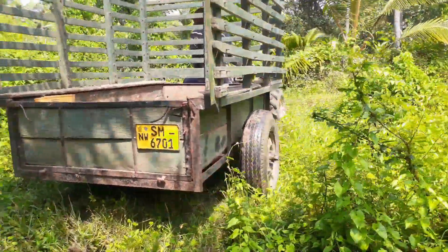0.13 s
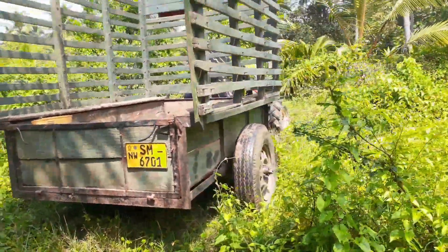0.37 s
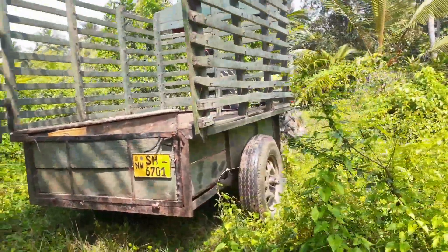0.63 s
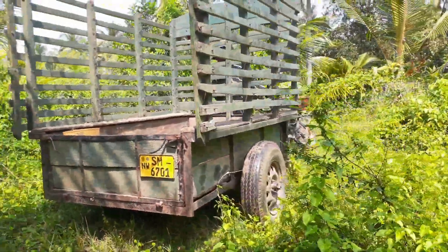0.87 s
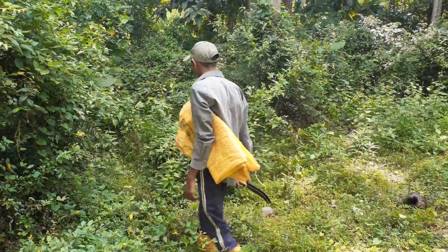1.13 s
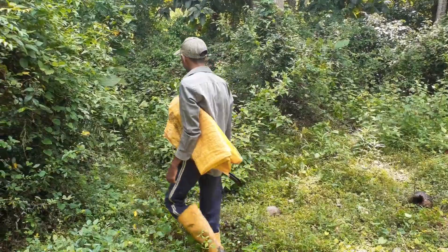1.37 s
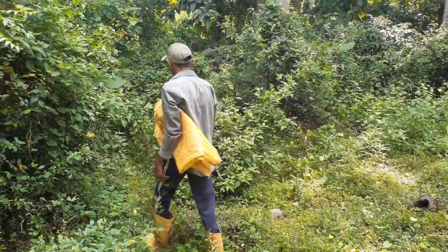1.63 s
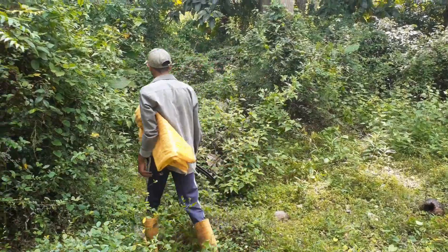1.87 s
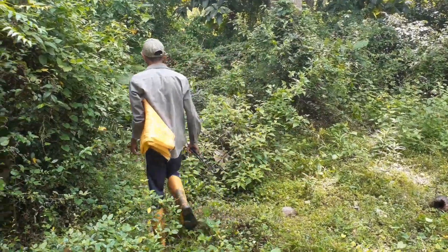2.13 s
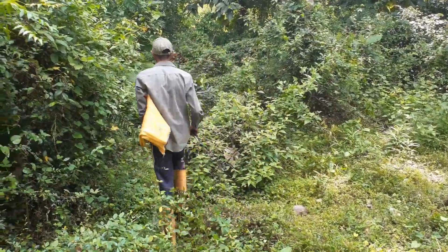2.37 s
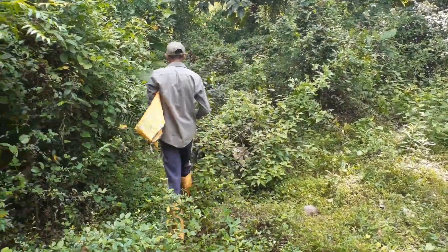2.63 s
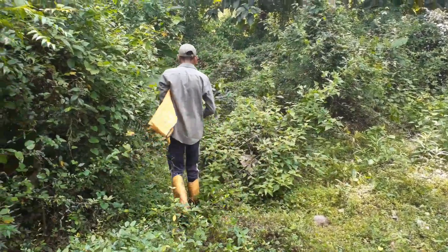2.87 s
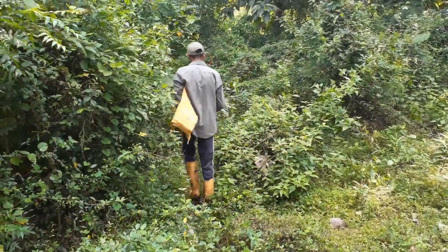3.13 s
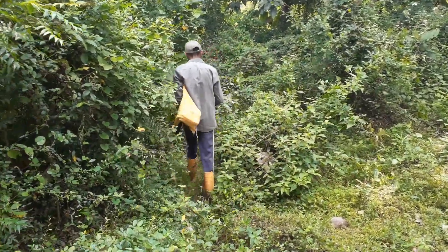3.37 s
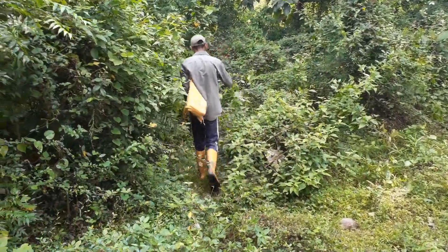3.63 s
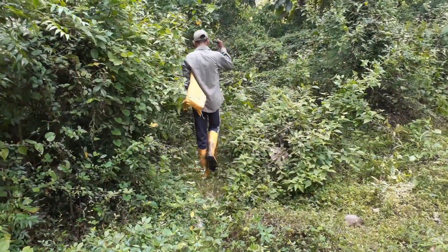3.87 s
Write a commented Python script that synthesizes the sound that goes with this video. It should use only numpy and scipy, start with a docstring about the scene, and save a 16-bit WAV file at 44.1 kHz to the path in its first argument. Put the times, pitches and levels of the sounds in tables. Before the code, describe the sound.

A diesel tractor engine pounds loudly and close from 0 to 0.96 s, about nine low puffs per second with metallic knocks, rattling panels and clanking slats. A hard cut drops to a very quiet field: a brief leaf crackle, sparse rustles, soft boot thuds and twig snaps, near 1.5, 1.7 and 3.0 s, fuller brushing from 3.5 s. Faint birds, dove coo until 2.2 s, wind and distant motor drone.

```python
"""A diesel tractor with one cylinder idles close by, with a slatted trailer: puffs, knocks, rattles and clanks.
Just before one second the scene cuts to a scrubby field where boots brush through leaves and snap twigs.
Birds call, wind moves far foliage and a far motor drones.
Puffs, rings, snaps, steps and whistles are shaped sines; knocks, rattle, leaves and wind are coloured noise;
panels, dove and motor are noise through narrow resonances."""
import sys
import numpy as np
from scipy import signal
from scipy.fft import rfft, irfft
from scipy.io import wavfile

SR = 44100
rng = np.random.default_rng(int(sys.argv[2]) if len(sys.argv) > 2 else 0)


def voltage_ratio(decibels):
    """Convert decibels (scalar or array-like) to amplitude ratios, 20 dB per decade."""
    exponent = np.asarray(decibels, float) / 20
    return 10 ** exponent


def put_to_file(sound):
    """Save the sound as 16-bit audio at rate SR, in the file named by the first command-line argument."""
    columns = np.atleast_2d(sound).T  # one column per channel
    safe = np.clip(columns, -1, 1)
    whole_steps = np.round(safe * 32767)
    wavfile.write(sys.argv[1], SR, whole_steps.astype(np.int16))


N = 176400   # four seconds
CUT_S = 0.96   # the tractor gives way to the field

# Exhaust puffs: (time of the crest [s], relative level [dB])
PUFFS = [(-0.0176, -9.5), (0.0904, -10), (0.2, -10), (0.3059, -11), (0.4169, -10.5), (0.526, -10),
         (0.6324, -10.6), (0.7435, -9.5), (0.853, -10), (0.9586, -9.5)]
# First sound and echoes of each puff: (delay [s], pitch [Hz], relative level [dB], swell scale [s])
PUFF_PARTS = [(0.0012, 124, -2.5, 0.0032), (.0256, 156, -3, 0.0016), (.012, 190, -9.5, 0.0018),
              (.0375, 150, -11, 0.0018), (0.0012, 110, -14, 0.0068)]
# Ringing of the silencer: (pitch [Hz], relative level [dB], time to fall 60 dB [s])
SILENCER_RINGS = [(110.5, -20.5, 0.88), (253, -20, 0.1)]
# Diesel knocks: (time [s], relative level [dB])
KNOCKS = [(-0.078, -1.5), (0.0579, -15), (0.163, -18), (0.2728, -17), (0.3799, -15), (0.4893, -14),
          (0.5969, -14.5), (0.707, -11.5), (0.8161, -16), (0.9255, -13)]
# Colour of the knock: (frequency [Hz], relative level per Hz [dB])
KNOCK_COLOUR = [(410, -36), (700, -10), (1830, 1.5), (2810, -5), (3990, -16), (4540, -16), (7740, -36),
                (10200, -37), (15600, -26)]
KNOCK_DB, KNOCK_T60_S = -6, 0.06
KNOCK_TAIL_DB, KNOCK_TAIL_T60_S = -17, 0.39
# Ringing of the engine block: (pitch [Hz], relative level [dB], time to fall 60 dB [s])
BLOCK_RINGS = [(1373, -26.5, 0.2), (1660, -22.5, 0.034), (1780, -11.5, 0.085), (2007, -30.5, 0.13),
               (2730, -24, 0.043), (2995, -14.5, 0.035)]
# Colour of the block and trailer rattle: (frequency [Hz], relative level per Hz [dB])
RATTLE_COLOUR = [(24, -42), (60, -26), (150, 1), (260, -5.5), (378, -13.5), (523, -8), (862, -11),
                 (1780, -12.5), (4370, -22), (7750, -45), (12200, -38), (15600, -27.5)]
RATTLE_DB = -28
SHAKE_DB, SHAKE_S = 3, 0.038   # size and spread of the swell after each puff
# Humming panels: (pitch [Hz], width [Hz], relative level [dB])
PANELS = [(519, 16.3, -43.5), (764, 63, -46), (1034, 29, -46)]
CLANK_COUNT, CLANK_DB, CLANK_CYCLES = 67, -27.5, 21.81   # weakest level; cycles to fall 60 dB

# Likeness of left and right near the tractor: (frequency [Hz], likeness [-1 to 1])
NEAR_ALIKE = [(60, 0.89), (240, 1), (950, 0.67), (3770, 0.033), (15000, 0.062)]
# Likeness of left and right in the field: (frequency [Hz], likeness [-1 to 1])
FIELD_ALIKE = [(60, 0.2), (240, 0.78), (950, 0.35), (3770, -0.12), (15000, -0.14)]
# Balance near the tractor: (frequency [Hz], left minus right [dB])
NEAR_PAN = [(60, -3), (950, -2.5), (15000, -2.5)]
# Balance in the field: (frequency [Hz], left minus right [dB])
FIELD_PAN = [(60, -11.5), (380, -3), (2380, -3.5), (15000, 1.5)]

# Brushing through leaves: (time [s], crackle before trim [dB], stems relative to crackle before trim [dB])
BRUSH = [(0.96, -39.5, -16), (0.978, -25, -37), (1.028, -53, -9.5), (1.12, -58, -9.5), (1.39, -56.5, -10.5),
         (1.41, -63, -18), (1.45, -64, -6), (1.485, -46.5, 2), (1.53, -54, -1.5), (1.7, -55.5, -12),
         (1.711, -55.5, 6.5), (1.79, -57.5, -7), (1.87, -53, -0.5), (2.19, -68.5, -8), (2.29, -52, -6.5),
         (2.37, -61.5, -9.5), (2.43, -68, -9.5), (2.678, -54.5, -5.5), (2.871, -63.5, -2), (2.921, -48, -2),
         (3.005, -43, 2.5), (3.029, -54.5, 5), (3.1, -61, -5), (3.142, -59.5, 10.5), (3.26, -58, -8),
         (3.32, -53, -5), (3.5, -47.5, -14), (3.52, -40.5, -9.5), (3.62, -38.5, -8.5), (3.68, -46.5, -5.5),
         (3.74, -42, -8), (3.84, -50, -11), (4.0, -48.5, -2.5)]
# Colour of leaves and stems: (frequency [Hz], relative level per Hz [dB])
LEAF_COLOUR = [(120, -56), (200, -2.5), (346, -13), (600, -6.5), (1250, -5), (2100, -5), (2970, 2.5),
               (4990, 2.5), (8500, -23.5), (11000, -42), (18700, -120)]
STEM_HZ = 2200   # stems below, leaf crackle above
# Swishing of dry tips: (time [s], level [dB])
SWISH = [(0.96, -45), (0.98, -38.5), (1.0, -52.5), (1.11, -66.5), (1.34, -61.5), (1.43, -71), (1.58, -56.5),
         (1.67, -62.5), (1.74, -51.5), (2.17, -69), (2.29, -54.5), (2.45, -74), (2.6, -59.5), (2.68, -51),
         (2.76, -74), (2.9, -78), (2.92, -59), (2.99, -47), (3.06, -64.5), (3.28, -66), (3.4, -57),
         (3.64, -45), (3.69, -56), (3.74, -49.5), (3.89, -58), (4.0, -53)]
# Colour of the dry tips: (frequency [Hz], relative level per Hz [dB])
TIP_COLOUR = [(4710, -32), (8000, -19.5), (10400, -6.5), (13100, -3.5), (15600, 10)]
# Twig snaps: (time [s], relative level [dB], pitch [Hz])
SNAPS = [(0.969, -31, 4770), (.979, -29, 3440), (0.983, -26, 5360), (1.461, -35, 720), (1.481, -34, 1440),
         (1.487, -36, 2150), (1.491, -34, 3150), (1.517, -35, 1850), (1.7095, -36, 750), (1.716, -27, 760),
         (1.7165, -33, 1380), (2.243, -47, 1380), (2.92, -34, 1420), (2.945, -36, 3300), (2.984, -36, 650),
         (2.99, -33, 3300), (2.999, -27, 2800), (3.0, -32, 1800), (3.141, -37, 1400), (3.309, -37, 4500),
         (3.396, -45, 1500), (3.518, -36, 1660), (3.5315, -29, 1290), (3.532, -24, 3600),
         (3.619, -35, 4900), (3.738, -30, 3800), (3.805, -35, 4140), (3.946, -37, 1860)]
SNAP_T60_S, SNAP_CYCLES = 0.005, 16   # fixed part of the ring, plus this many cycles
CRACK_DB, CRACK_T60_S = -9, 0.012   # noise burst, relative to its snap
# Boots landing: (time [s], relative level [dB])
STEPS = [(1.717, -43), (1.882, -43), (1.902, -42), (3.142, -42), (3.37, -45), (3.945, -36)]
STEP_HZ, STEP_T60_S = 230, 0.06   # pitch before its random change

# Bird notes: (time [s], length [s], start [Hz], end [Hz], level [dB], bend [under 1 early, over 1 late])
NOTES = [(2.358, .02, 4500, 5450, -58, .6), (2.386, .036, 5400, 4300, -58, 2),
         (2.412, .11, 5380, 5300, -70, 1), (1.935, .06, 6900, 6620, -65, .4),
         (2.11, .12, 6750, 6380, -64, .3)]
# Throbbing calls: (time [s], length [s], pitch [Hz], level at the start [dB])
TRILLS = [(1.373, 0.065, 2987, -55), (2.646, 0.1, 2960, -56), (2.75, .12, 3000, -64),
          (3.176, 0.28, 2930, -54), (3.78, 0.14, 2980, -57)]
THROB_HZ, THROB_DB, WAVER_HZ = 45, 3, 20   # throb rate and spread; spread of the pitch
# Coo of a far dove: (time [s], level [dB])
COO = [(.97, -53), (1.0, -63), (1.18, -53.5), (1.22, -70), (1.54, -70), (1.6, -61), (1.9, -57),
       (1.96, -53.5), (2.08, -53.5), (2.11, -73), (2.25, -88.5)]
COO_HZ, COO_WIDTH_HZ = 769.7, 31
# Husky undertone of the coo: (time [s], level [dB])
COO_BREATH = [(.97, -61), (1.4, -64), (1.9, -57), (2.05, -77), (2.15, -69)]
BREATH_HZ, BREATH_WIDTH_HZ = 718, 154

# Colour of the wind in far foliage: (frequency [Hz], relative level per Hz [dB])
WIND_COLOUR = [(18, -40), (30, -21), (88, 5.5), (370, -19), (658, -9.5), (1000, -25), (1400, -14),
               (1600, -51), (2630, -25), (4000, -27), (6580, -11), (7500, -31), (8330, -83), (11400, -27.5),
               (15600, -25)]
WIND_DB = -58.5
# Far motor: (pitch [Hz], width [Hz], relative level [dB])
DRONE = [(62.8, 8.1, -5), (92.9, 9.1, 2.5), (122.5, 12, -7.5), (155.4, 6, -14.5)]
# The motor comes and goes: (time [s], level [dB])
DRONE_SWELL = [(1.0, -59), (2.76, -63.5), (3.6, -54), (4.0, -55.5)]


def rms_one(x):
    """Scales a sound to an rms of 1."""
    return x / np.sqrt(np.mean(x ** 2) + 1e-20)


def clock():
    """The time of every sample in seconds."""
    return np.arange(N) / SR


def at_hz(points, hz):
    """Reads a table at a frequency, along a logarithmic pitch scale."""
    table_hz, values = np.transpose(points)
    return np.interp(np.log(hz), np.log(table_hz), values)


def loudness(points):
    """Turns (time, dB) points into a gain that is nearly silent after the last point."""
    return voltage_ratio(np.interp(clock(), *np.transpose(points), right=-99))


def keep_band(x, order, hz, kind):
    """Keeps the part of a sound above, below or between the given frequencies."""
    return signal.sosfilt(signal.butter(order, hz, kind, fs=SR, output="sos"), x)


def drift(rate):
    """Slow random wandering with spread 1; a higher rate in Hz wanders faster."""
    step = 40   # computed at every 40th sample, joined by straight lines
    r = np.exp(-2 * np.pi * step * rate / SR)
    slow = signal.lfilter([1], [1, -2 * r, r * r], rng.standard_normal(N // step + 2002))[2000:]
    return np.interp(np.arange(N) / step, np.arange(len(slow)), rms_one(slow))


def hum(hz, width_hz):
    """Noise passed twice through a narrow resonance, giving a rough tone; rms 1."""
    r = np.exp(-np.pi * width_hz / SR)
    poles = [1, -2 * r * np.cos(2 * np.pi * hz / SR), r * r]
    once = signal.lfilter([1, 0, -1], poles, rng.standard_normal(N + SR))
    return rms_one(signal.lfilter([1], poles, once)[SR:])   # skip the build-up


def strike(s, hz, t60):
    """A struck object's tone: a sine that builds in half a cycle from s and dies away."""
    out, i = np.zeros(N), int(s * SR)
    first = max(i, 0)
    t = np.arange(first, min(N, i + int(1.5 * t60 * SR))) / SR - s
    rise = np.clip(t * hz * 2, 0, 1)
    out[first:first + len(t)] = np.sin(2 * np.pi * hz * t) * voltage_ratio(-60 * t / t60) * rise
    return out


def die_away(s, t60):
    """A gain that jumps to 1 at s and falls 60 dB in t60 seconds."""
    t = clock() - s
    return voltage_ratio(-60 * np.maximum(t, 0) / t60) * (t > 0)


def pan(x, db):
    """Places a sound in stereo; db is left minus right."""
    return x * voltage_ratio(np.array([[db / 2], [-db / 2]]))


def coloured(spectrum, alike, balance, patchy_db, grains_per_s=0, grain_db=0):
    """Stereo noise in about third-octave bands that flicker and may crackle, then coloured; rms 1."""
    out, edges = 0, 30 * 2 ** (np.arange(30) / 3.15)
    white = rng.standard_normal((2, 2, N))
    click_db = grain_db + 4.0 * np.minimum(rng.exponential(1, N), 3)
    clicks = voltage_ratio(click_db) * (rng.random(N) < grains_per_s / SR)
    # each click goes to one of seven groups of bands and has its own place
    group, place = rng.integers(0, 7, N), rng.uniform(-1, 1, N)
    for k, (low, high) in enumerate(zip(edges, edges[1:])):
        hz = np.sqrt(low * high)
        if spectrum[0][0] < hz < spectrum[-1][0]:
            mine = clicks * (group == k // 2 % 7)
            mid, side = keep_band(white[k % 2] + [mine, mine * place], 2, [low, high], "band")
            likeness = np.clip(at_hz(alike, hz), -1, 1)
            band = np.sqrt(1 + likeness) * mid + np.sqrt(1 - likeness) * side * [[1], [-1]]
            out = out + voltage_ratio(patchy_db * drift(12.3)) * pan(band, at_hz(balance, hz))
    colour = voltage_ratio(at_hz(spectrum, np.arange(1, N // 2 + 2) * SR / N))
    return rms_one(irfft(rfft(out) * colour, N))


def exhaust():
    """Each puff swells and dies at the pipe's pitch, echoes more briefly and leaves the silencer ringing."""
    out = np.zeros(N)
    for s, db in PUFFS:
        for delay, hz, part_db, swell in PUFF_PARTS:
            t = clock() - s - delay - rng.normal(0, 0.000624)
            rise = np.maximum(t / swell / 1.88 + 1.66, 0)
            shape = (rise * np.exp(1 - rise)) ** 3   # loudest where rise is 1
            out += voltage_ratio(db + part_db + rng.normal(0, 0.65)) * shape * np.cos(2 * np.pi * hz * t)
        for hz, ring_db, t60 in SILENCER_RINGS:
            out += voltage_ratio(db + ring_db) * strike(s - 0.14 / hz, hz, t60)
    return pan(keep_band(out, 2, 45.0, "high"), -3.5)


def engine_block():
    """Each knock is a burst with a tail that rings the block; rattle and panels swell with every puff."""
    knock, rings = 0, 0
    for s, db in KNOCKS:
        knock = knock + voltage_ratio(db + KNOCK_DB) * die_away(s, KNOCK_T60_S)
        knock = knock + voltage_ratio(db + KNOCK_TAIL_DB) * die_away(s, KNOCK_TAIL_T60_S)
        for hz, mode_db, t60 in BLOCK_RINGS:
            level = voltage_ratio(db + mode_db + rng.normal(0, 3.2, (2, 1)))   # left and right differ
            rings = rings + level * strike(s + rng.uniform(0, 0.00313), hz * rng.normal(1, 0.0302), t60)
    swells = sum(np.exp(-((clock() - s - 0.01) / SHAKE_S) ** 2) for s, _ in PUFFS)
    shake = voltage_ratio(SHAKE_DB * swells)
    panels = sum(voltage_ratio(db + 4.8 * drift(18.5)) * hum(hz, width) for hz, width, db in PANELS)
    rattle = voltage_ratio(RATTLE_DB) * coloured(RATTLE_COLOUR, NEAR_ALIKE, NEAR_PAN, 2.2, 400, 12.2)
    knock = knock * coloured(KNOCK_COLOUR, NEAR_ALIKE, NEAR_PAN, 2, 600, 14.0)
    return knock + pan(rings, -2.5) + shake * (rattle + pan(panels, -5.0))


def clanks():
    """Loose slats and panels clank: short rings at random times, pitches and places in the first second."""
    out = 0
    for s, pitch, size, place in rng.random((CLANK_COUNT, 4)):
        hz = 428.0 * 5.5 ** pitch
        ring = voltage_ratio(CLANK_DB + 10 * size) * strike(s, hz, CLANK_CYCLES / hz)
        out = out + pan(ring, -3.0 + 12.0 * (place - 0.5))
    return out


def brushing():
    """Leaves crackle, heavy stems scrape and dry tips swish: coloured noise under changing gains."""
    s, crackle_db, stems_db = np.transpose(BRUSH)
    foliage = coloured(LEAF_COLOUR, FIELD_ALIKE, FIELD_PAN, 3, 800, 14.0)
    leaves = rms_one(keep_band(foliage, 4, STEM_HZ, "high"))
    stems = rms_one(keep_band(foliage, 4, STEM_HZ, "low"))
    leaves_gain = voltage_ratio(np.interp(clock(), s, crackle_db - 1.0))
    stems_gain = voltage_ratio(np.interp(clock(), s, crackle_db + stems_db + 2.5))
    tips = loudness(SWISH) * coloured(TIP_COLOUR, FIELD_ALIKE, FIELD_PAN, 2.9, 300, 13.0)
    return leaves_gain * leaves + stems_gain * stems + tips


def twigs_and_boots():
    """Twigs crack as noise and ring in three close tones; boots land as short low double thuds."""
    out, crack = np.zeros(N), np.zeros(N)
    for s, db, hz in SNAPS:
        for ratio, near_db, lag in ((1, 0, 0), (1.22, -9, 0.0007), (0.83, -10, 0.002)):
            out += voltage_ratio(db + near_db) * strike(s + lag, ratio * hz, SNAP_T60_S + SNAP_CYCLES / hz)
        crack += voltage_ratio(db + CRACK_DB) * die_away(s, CRACK_T60_S)
    out += crack * keep_band(rng.standard_normal(N), 2, [700, 6000], "band")
    for s, db in STEPS:
        for lag in (0, 0.009):
            out += voltage_ratio(db) * strike(s + lag, STEP_HZ * rng.uniform(0.85, 1.1), STEP_T60_S)
    return pan(out, -5.0)


def birds():
    """Gliding sine whistles, an unevenly throbbing call and a dove's breathy coo made of narrow noise."""
    out, t = np.zeros(N), clock()
    for s, length, hz0, hz1, db, bend in NOTES:
        x = np.clip((t - s) / length, 0, 1)
        hz = hz0 + (hz1 - hz0) * x ** bend
        gain = voltage_ratio(db + 1.4 * drift(44.5)) * np.sin(np.pi * x) ** 0.43
        out += gain * np.sin(2 * np.pi * np.cumsum(hz) / SR)
    for s, length, hz, db in TRILLS:
        x = np.clip((t - s) / length, 0, 1)
        gain = voltage_ratio(db + THROB_DB * drift(THROB_HZ) - 5 * x) * np.sin(np.pi * x) ** 0.4
        whistle = np.sin(2 * np.pi * np.cumsum(hz + WAVER_HZ * drift(12)) / SR)
        out += gain * (whistle + 0.35 * hum(hz, 120.0))
    coo = loudness(COO) * hum(COO_HZ, COO_WIDTH_HZ)
    coo += loudness(COO_BREATH) * hum(BREATH_HZ, BREATH_WIDTH_HZ)
    return pan(out, -12.0) + pan(coo, -4.0)


def far_motor():
    """A distant motor: a few low, rough tones that come and go together."""
    tones = sum(voltage_ratio(db) * hum(hz, width) for hz, width, db in DRONE)
    return pan(loudness(DRONE_SWELL) * tones, -5.5)


def wind():
    """Wind in far foliage: coloured noise that flickers but has no crackles."""
    return voltage_ratio(WIND_DB) * coloured(WIND_COLOUR, FIELD_ALIKE, FIELD_PAN, 3.2)


def scene():
    """The tractor, then a hard cut to the field."""
    later = np.clip((clock() - CUT_S) / 0.00074, 0, 1)   # crosses over in under a millisecond
    tractor = exhaust() + engine_block() + clanks()
    field = brushing() + twigs_and_boots() + birds() + far_motor() + wind()
    return (1 - later) * tractor + later * field


def band_limit(x):
    """A steep low-pass at the top of the band."""
    return signal.sosfilt(signal.butter(12, 17060, fs=SR, output="sos"), x)


def record(dry):
    """Cuts the top steeply, to 60 dB down at 16300 Hz, and finishes the mix."""
    steep = signal.cheby2(14, 60, 16300, fs=SR, output="sos")
    mix = signal.sosfilt(steep, dry)
    return band_limit(mix)


dry = scene()
out = record(dry)
put_to_file(out)
```